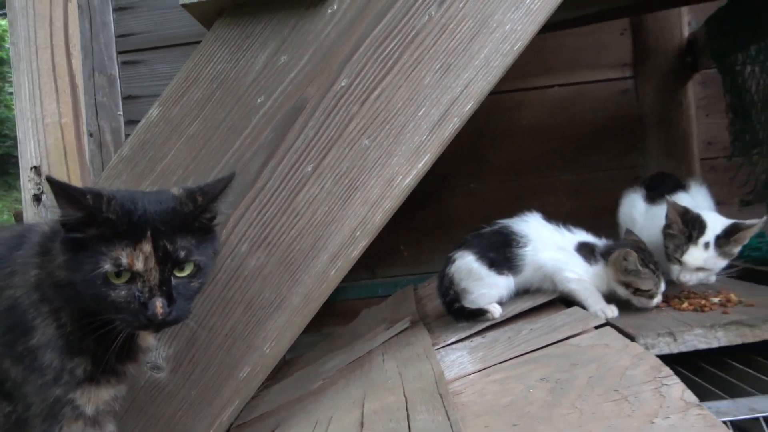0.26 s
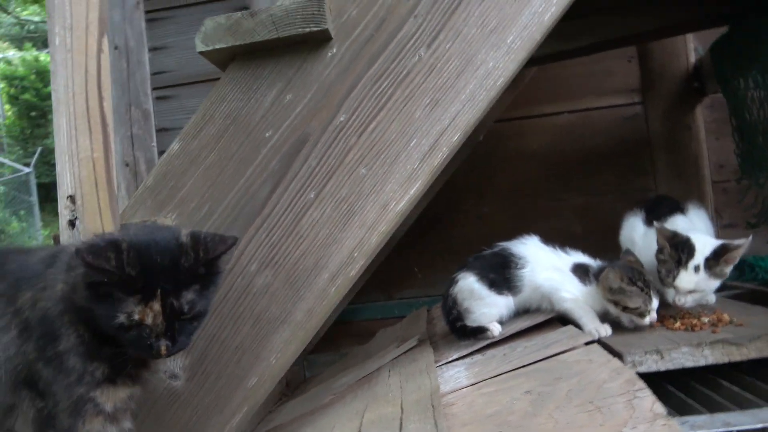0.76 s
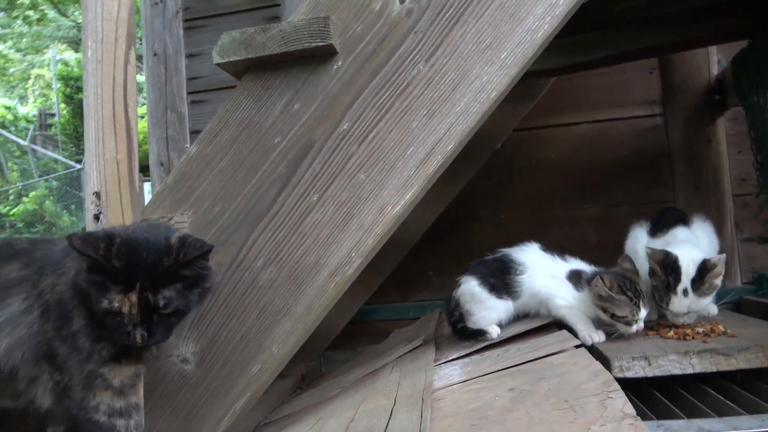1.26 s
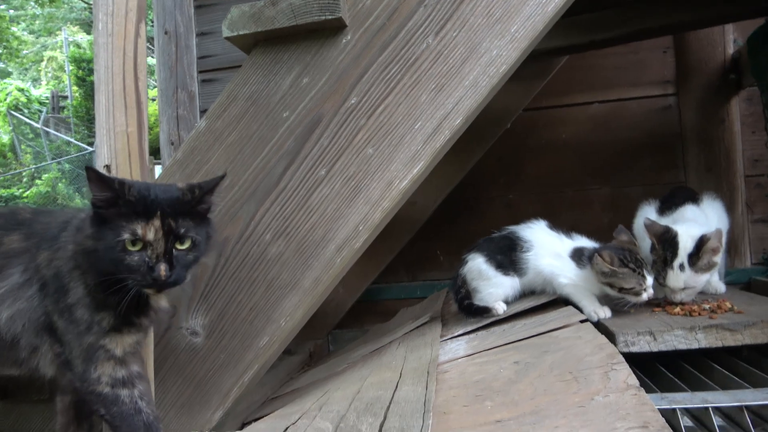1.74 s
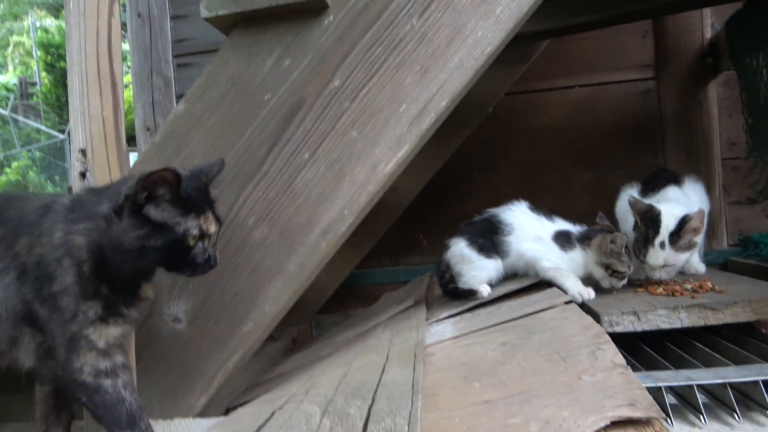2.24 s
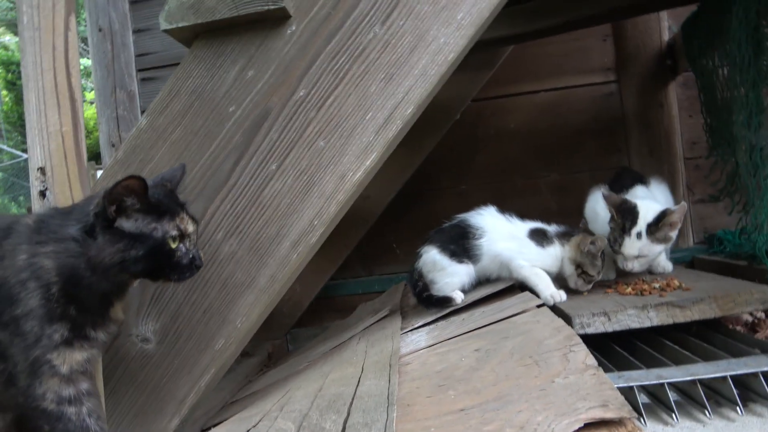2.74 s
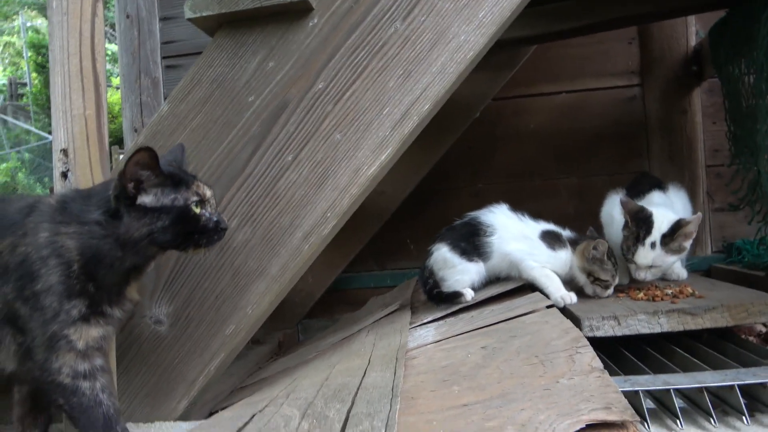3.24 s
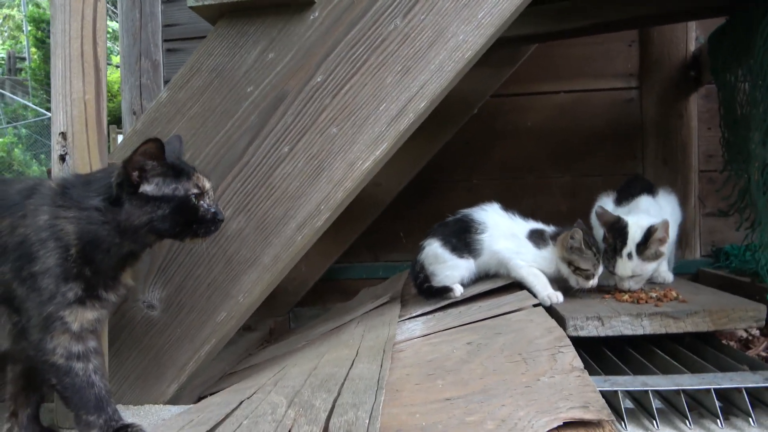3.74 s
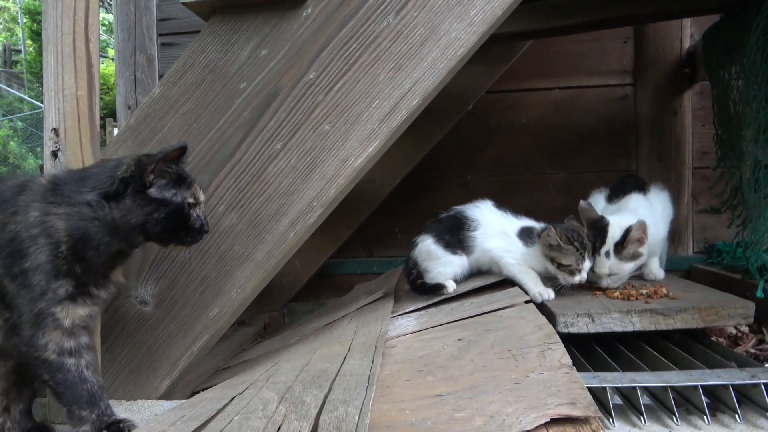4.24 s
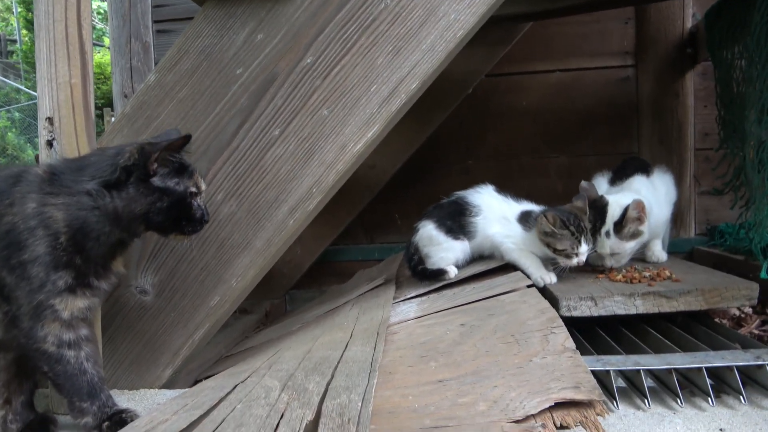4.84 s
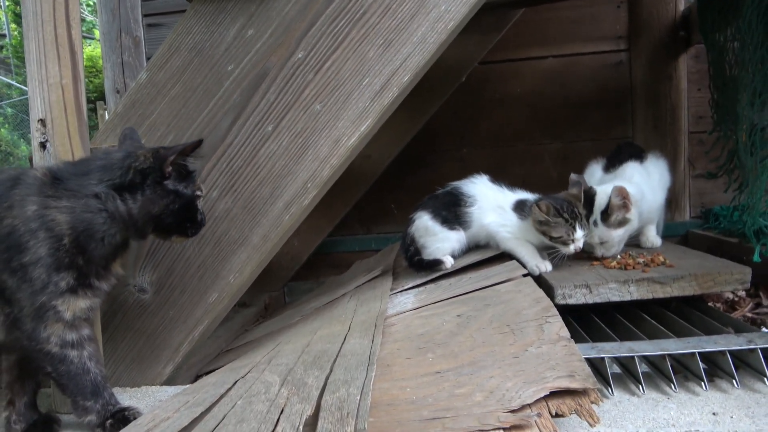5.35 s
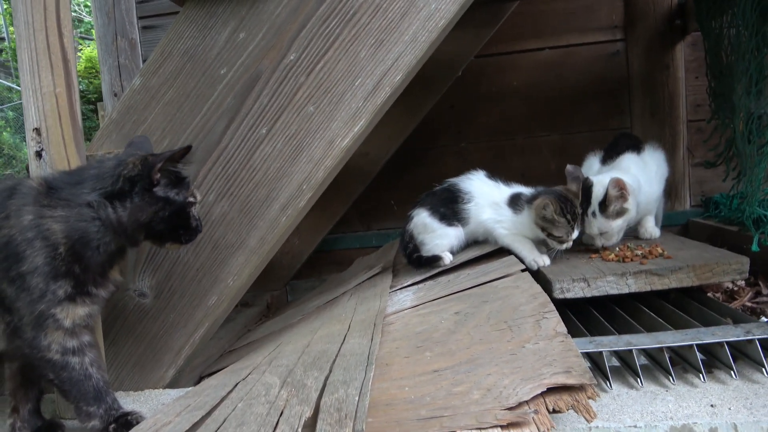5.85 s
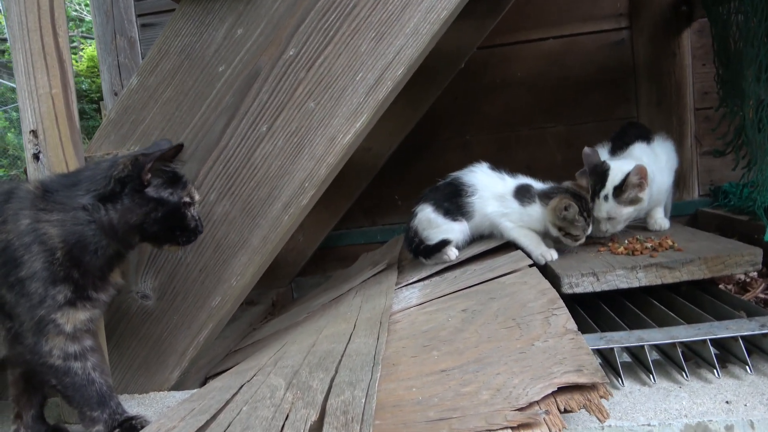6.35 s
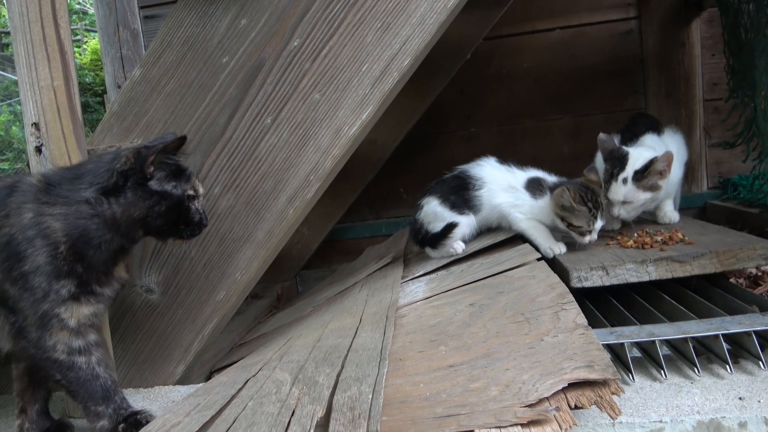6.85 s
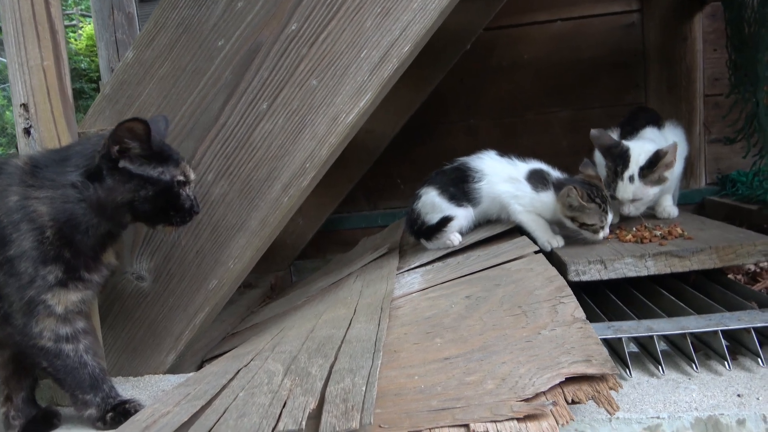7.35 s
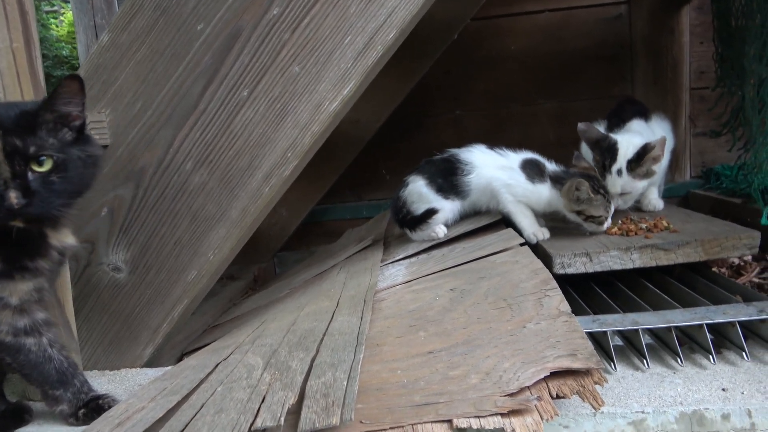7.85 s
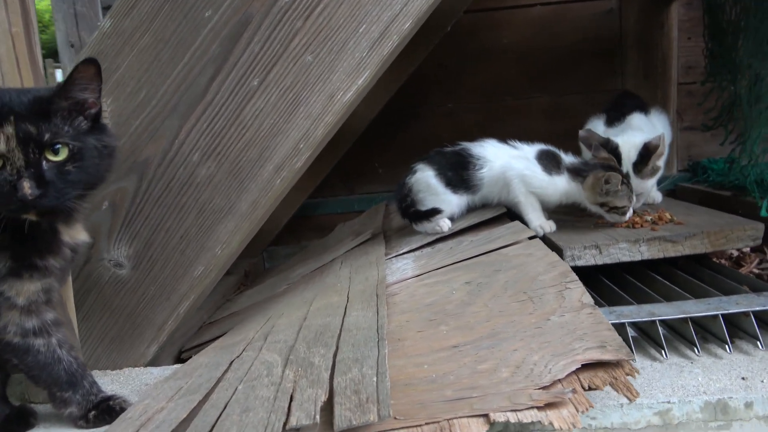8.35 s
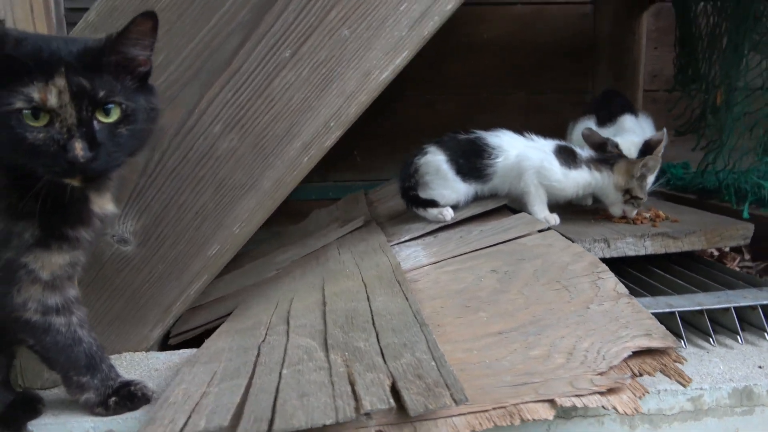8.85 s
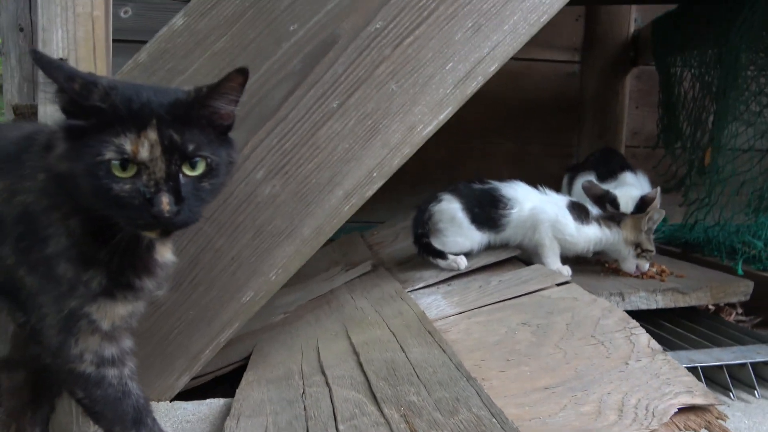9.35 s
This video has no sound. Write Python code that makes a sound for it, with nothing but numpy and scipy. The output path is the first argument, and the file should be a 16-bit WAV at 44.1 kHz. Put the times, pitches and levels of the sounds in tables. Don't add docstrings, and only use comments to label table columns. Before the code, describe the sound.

A nearby summer cicada buzzes in a fast, shrill pulsing rasp over a dense far insect chorus, with faint clicks as kittens eat dry food.

```python
import sys
import numpy as np
from scipy import signal
from scipy.fft import rfft, irfft, next_fast_len
from scipy.io import wavfile
from scipy.ndimage import uniform_filter1d, map_coordinates

SR = 44100
rng = np.random.default_rng(int(sys.argv[2]) if len(sys.argv) > 2 else 0)


def convert_level_to_amplitude(level_db):
    exponent = np.asarray(level_db, float) / 20
    return 10 ** exponent


def dump_mix(stems):
    frames = np.atleast_2d(stems).T
    limited = np.clip(frames, -1, 1)
    pcm = np.round(limited * 32767).astype(np.int16)
    wavfile.write(sys.argv[1], SR, pcm)


N = 423360

# [t/s, pumping lead/cycles, effort level/dB, lower against upper body mode level/dB]
NEAR_SINGER = [(0.0, -0.55, -24.5, -2), (.8, -0.4, -27, 0), (1.3, -0.44, -25.5, -1),
               (1.8, -0.45, -25.5, -5), (2.8, -0.55, -25, -3), (3.2, -0.47, -25, -3),
               (3.8, -.57, -24.5, -3), (4.1, -0.49, -24.5, -2), (4.8, -0.5, -26, -5.5),
               (5.4, -0.56, -27.5, -3.5), (5.7, -0.41, -27, -4), (6.5, -0.34, -27.5, -3.5),
               (6.8, -0.23, -27, -3), (7.1, 0.089, -28.5, -3), (7.3, 0.053, -25.5, 1),
               (8.2, 0.0081, -26.5, 1.5), (9.2, -0.3, -26.5, -1), (9.6, -0.32, -29, -14)]
# [f/Hz, level/dB]
BODY_BAND = [(4000, -16.5), (4500, -10.5), (4900, -7), (5300, 3), (5700, -2), (6200, 3.5), (6600, 1),
             (7500, -3), (8500, -8), (9300, -7), (9800, -24)]
# [f/Hz, level/dB]
OVERTONE_BAND = [(9500, -37), (11000, -1), (12500, 5.5), (13500, 0.5), (15500, 11), (16500, -4)]
# [f/Hz, level/dB]
RASP_BAND = [(13000, -13), (14300, 5), (15600, -2), (16500, 3)]
# [f/Hz, level/dB]
DRONE_BAND = [(1900, -11.5), (2200, -5.5), (2400, 2), (2600, 4.5), (2900, 2.5), (3100, -5), (3400, -8)]
# [t/s, level/dB]
CHORUS_LEVEL = [(0.0, -22), (2.65, -22), (3.7, -23), (4.2, -23.5), (5.1, -22.5), (5.5, -22.5), (7.2, -22.5),
                (7.6, -23), (8.3, -23.5), (8.8, -22.5), (9.1, -23), (9.4, -21.5), (9.6, -22)]
# [f/Hz, level/dB per Hz]
CHORUS_LOW_BAND = [(2000, -97), (3400, -40), (3980, -27.5), (4300, -15.5), (4960, -4.5), (5660, -2.5),
                   (6120, -3), (7460, -6), (8070, -6), (9260, -13.5), (9520, -22.5), (10200, -19.5),
                   (13300, -54), (22000, -120)]
# [f/Hz, level/dB per Hz]
CHORUS_HIGH_BAND = [(9000, -25), (9900, -16), (11000, -8), (12100, -3.5), (13100, -7), (14200, -3),
                    (15100, -2.5), (16000, -12)]
# [f/Hz, level/dB per Hz]
AIR_SPECTRUM = [(12, -45), (20, -0.5), (118, 6.5), (476, 0), (694, -3.5), (759, -1), (1010, -15),
                (1720, -9.5), (2510, -5), (2810, -9.5), (3350, -4.5), (4000, -17), (5200, -39),
                (8800, -120)]
# [f/Hz, level/dB]
RUSTLE_SPECTRUM = [(250, -10), (500, -2.5), (800, -1), (1150, -2), (1700, -10), (3000, -13)]
# [f/Hz, level/dB]
DISTANT_MOTOR = [(107.7, -75)]
# [f/Hz, correlation/1]
MIC_LIKENESS = [(60, 0.5), (130, 0.36), (290, 0.3), (640, 0.61), (1410, 0.59), (3100, 0.97), (6820, 0.85),
                (15000, 0.81)]
# [f/Hz, left minus right level/dB]
MIC_LEAN = [(60, 2), (110, 2), (200, 0.5), (380, 1.5), (700, 3), (1290, -1), (2380, 6), (4400, 4),
            (6000, 0.1), (8120, 0.7), (15000, 0.5)]
# [t/s, peak level/dB, ring f/Hz]
FOOD_NUDGES = [(.13, -34, 915), (.251, -28.5, 900), (.417, -37, 318), (.452, -39, 660), (.489, -33, 816),
               (.724, -27, 1220), (.812, -33, 960), (1.216, -26, 660), (1.281, -25.5, 960),
               (1.411, -37, 759), (2.149, -34, 649), (2.524, -29, 1160), (3.218, -37, 301),
               (6.786, -31, 547), (9.303, -27.5, 660), (9.401, -46, 640), (9.42, -24, 1006)]
# [t/s, peak level/dB, ring f/Hz]
FOOD_CRACKS = [(.023, -39, 530), (.394, -31, 610), (.395, -31, 3200), (.684, -39, 740), (.723, -38, 1800),
               (.794, -45, 673), (.986, -36, 855), (1.323, -42, 1620), (1.62, -43, 1000), (2.188, -42, 579),
               (2.485, -34.5, 1160), (2.61, -36, 620), (2.646, -32.5, 2000), (4.904, -37.5, 1080),
               (5.215, -40, 1330), (6.977, -33, 595), (7.036, -41, 610), (7.093, -38, 650),
               (9.421, -37, 3030)]
# [t/s, peak level/dB, ring f/Hz]
HAND_GRIPS = [
    (1.799, -36, 780),
    (4.129, -37, 428),
    (4.903, -28, 305),
    (6.807, -23.5, 710),
    (7.264, -37, 301),
    (7.491, -32.5, 630),
    (7.671, -35.5, 750),
    (8.882, -36, 665),
]
# [thud level/dB, tick level/dB, left minus right level/dB]
CONTACT_KINDS = [
    (-19, -22, 4),
    (-21, -4.5, 1),
    (-4.5, -21, 2.5),
]

PUMP_HZ = 13.8
SLACK_HZ, TAUT_HZ = 5620, 9200
LIFT_STARTS, LIFT_TAKES, DROP_STARTS, DROP_TAKES, REST = 0.096, 0.37, 0.64, 0.23, 0.14
OVERTONE_DB, OVERTONE_GROWS = -30, 0.95
HIGH_DB = -4
RUSTLE_DB, BUSY_DB, BUSY_S = -63, 2.5, .2


def unit(x):
    return x / np.sqrt(np.mean(x ** 2) + 1e-20)


def along(points, hz):
    f, value = np.transpose(points)
    return np.interp(np.log(hz + 1), np.log(f + 1), value)


def shape(points, hz):
    below = (points[0][0] * .7, -100)
    above = (points[-1][0] * 1.3, -100)
    return convert_level_to_amplitude(along([below] + list(points) + [above], hz))


def curves(rows):
    s, *columns = np.transpose(rows)
    return [np.interp(np.arange(N) / SR, s, column) for column in columns]


def wobble(rate):
    knots = rng.standard_normal(int(N * rate / SR) + 4)
    return map_coordinates(knots, [np.arange(N) * rate / SR])


def filtered(x, response):
    m = next_fast_len(N + 8192)
    return irfft(rfft(x, m) * response(np.fft.rfftfreq(m, 1 / SR)), m)[..., :N]


def spread(pair, spectrum):
    def response(hz):
        turn = np.arccos(np.clip(along(MIC_LIKENESS, hz), -1, 1)) / 2
        return shape(spectrum, hz) * [np.cos(turn), np.sin(turn)]

    mid, side = filtered(pair, response)
    return unit(np.array([mid + side, mid - side]))


def patchy(patch_db):
    z = signal.stft(rng.standard_normal((2, N)), nperseg=512)[2]
    over_pitch = uniform_filter1d(rng.standard_normal(z.shape[1:]), 5, 0)
    field = uniform_filter1d(over_pitch, 8, 1)
    return signal.istft(z * convert_level_to_amplitude(patch_db * unit(field)), nperseg=512)[1][:, :N]


def tymbal(click_hz, drift, weak_db, rough, echo_s):
    cycles = np.cumsum(click_hz * (1 + drift * wobble(6))) / SR
    second = cycles % 1 > .5
    clicks = np.diff(np.floor(2 * cycles), prepend=0)
    clicks = clicks * convert_level_to_amplitude(weak_db * second + 0.5 * rng.standard_normal(N))
    t = np.arange(SR // 25) / SR
    heard = np.zeros((2, N))
    for side in (0, 1, 0, 1):
        scatter = rng.standard_normal((2, len(t))) * convert_level_to_amplitude(-60 * t / echo_s)
        one_tymbal = wobble(5) * (clicks * (second == side))
        heard += signal.oaconvolve(one_tymbal[None], scatter, axes=1)[:, :N]
    heard /= np.sqrt(np.abs(uniform_filter1d(heard ** 2, size=4000)) + 1e-9)
    share = np.clip(rough, 0, 1)
    return np.sqrt(1 - share) * heard + np.sqrt(share) * rng.standard_normal((2, N))


def singer():
    s, lead, _, lower_db = np.transpose(NEAR_SINGER)
    main_db = curves(NEAR_SINGER)[1]
    over_db = OVERTONE_DB + OVERTONE_GROWS * (main_db - main_db.mean())
    clicks = tymbal(click_hz=199.16, drift=.007, weak_db=-1, rough=0.24, echo_s=0.017)
    hz, t, z = signal.stft(clicks, SR, nperseg=256, noverlap=192)
    hz = hz[:, None]

    cycle = (PUMP_HZ * t + np.interp(t, s, lead)) % 1

    def ease(start, takes):
        return np.sin(np.pi / 2 * np.clip((cycle - start) / takes, 0, 1)) ** 2

    lift = REST + (1 - REST) * (ease(LIFT_STARTS, LIFT_TAKES) - ease(DROP_STARTS, DROP_TAKES))
    centre = SLACK_HZ + (TAUT_HZ - SLACK_HZ) * lift
    narrowing = 1 - 0.65 * lift

    lower = np.clip((5800 - hz) / 300, 0, 1) * (hz > 3500)
    effort_db = 0.89 * np.interp(t, np.arange(N) / SR, wobble(14))
    z = z * convert_level_to_amplitude(effort_db + lower * (np.interp(t, s, lower_db) + 3.0))

    def band(ratio, width_hz):
        resonance = np.exp(-.5 * ((hz - ratio * centre) / (width_hz * narrowing)) ** 2)
        return signal.istft(z * resonance, SR, nperseg=256, noverlap=192)[1][:, :N]

    main = convert_level_to_amplitude(main_db + 2.0) * spread(band(0.91, width_hz=1190), BODY_BAND)
    under = convert_level_to_amplitude(main_db - 32.0) * spread(band(0.55, width_hz=1700), DRONE_BAND)
    overtone = convert_level_to_amplitude(over_db + 2.0) * spread(band(1.752, width_hz=2070), OVERTONE_BAND)
    rasp = tymbal(click_hz=168, drift=0.0056, weak_db=-15, rough=.1, echo_s=0.004)
    raised = np.interp(np.arange(N) / SR, t, lift) ** 1.2
    shrill = convert_level_to_amplitude(over_db - 7.5) * unit(raised * spread(rasp, RASP_BAND))
    return main + under + shrill + overtone


def chorus():
    [low_db] = curves(CHORUS_LEVEL)
    high_db = low_db + HIGH_DB
    swell_db = 0.077 * wobble(7.4)
    crowd = convert_level_to_amplitude(low_db - 1.0 + swell_db) * spread(patchy(patch_db=1.5), CHORUS_LOW_BAND)
    crowd += convert_level_to_amplitude(high_db - 1.0 + swell_db) * spread(patchy(patch_db=1.0), CHORUS_HIGH_BAND)
    hum = tymbal(click_hz=193.4, drift=.004, weak_db=0, rough=0.74, echo_s=0.03)
    return crowd + convert_level_to_amplitude(-53 + 0.34 * wobble(12.0)) * spread(hum, DRONE_BAND)


def rustle():
    contacts = np.bincount([round(row[0] * SR) for row in FOOD_NUDGES + FOOD_CRACKS], minlength=N)
    busy = filtered(contacts, lambda hz: SR * BUSY_S * np.exp(-(np.pi * hz * BUSY_S) ** 2))
    level_db = RUSTLE_DB + BUSY_DB * np.sqrt(np.abs(busy)) * 2
    grains = convert_level_to_amplitude(4.4 * wobble(60)) * rng.standard_normal((2, N))
    return convert_level_to_amplitude(level_db) * spread(grains, RUSTLE_SPECTRUM)


def motor():
    t = np.arange(N) / SR
    return sum(convert_level_to_amplitude(db + wobble(2.95)) * np.sin(2 * np.pi * hz * t + 1.2 * wobble(3.3))
               for hz, db in DISTANT_MOTOR)


def air():
    level_db = -52.0 + 0.42 * wobble(2.14) + 0.76 * wobble(7.2)
    return convert_level_to_amplitude(level_db) * spread(patchy(patch_db=1.94), AIR_SPECTRUM)


def knocks():
    out = np.zeros((2, N + SR))
    t = np.arange(SR // 8) / SR

    def ring(hz, t60, rise):
        return np.sin(2 * np.pi * hz * t) * convert_level_to_amplitude(-60 * t / t60) * (1 - np.exp(-t / rise))

    groups = zip((FOOD_NUDGES, FOOD_CRACKS, HAND_GRIPS), CONTACT_KINDS)
    contacts = [(*row, *kind) for rows, kind in groups for row in rows]
    for s, db, hz, thud_db, tick_db, pan_db in contacts:
        low, high, top = rng.uniform([.4, 1.3, 1.9], [.7, 1.7, 2.5])
        hit = ring(hz, 0.012, 0.00095)
        hit += convert_level_to_amplitude(-11) * ring(high * hz, 0.016, 0.0019)
        hit += convert_level_to_amplitude(-10.5) * ring(low * hz, 0.019, 0.0014)
        hit += convert_level_to_amplitude(-9.5) * ring(top * hz, 0.0083, 0.00086)
        hit += convert_level_to_amplitude(thud_db + 5) * ring(137, 0.032, 0.01)
        tick_hz = rng.uniform([1390, 2100, 2770, 3480], [2130, 2800, 3380, 4350])
        hit += convert_level_to_amplitude(tick_db + 4) * sum(ring(f, 0.0066, 0.00029) for f in tick_hz)
        reflections = rng.standard_normal(2500) * convert_level_to_amplitude(-60 * t[:2500] / 0.043)
        echo = signal.fftconvolve(hit[:1500], reflections)
        hit[150:150 + len(echo)] += convert_level_to_amplitude(-34) * echo
        start = round((s + .0015) * SR)
        sides_db = np.array([[pan_db / 2], [-pan_db / 2]])
        out[:, start:start + len(t)] += convert_level_to_amplitude(db + 5.0 + sides_db) * hit
    return out[:, :N]


def scene():
    return singer() + chorus() + rustle() + motor() + air() + knocks()


def top_cut(x):
    return signal.sosfilt(signal.butter(12, 15800, fs=SR, output="sos"), x)


def record(dry):
    heard = dry / (1 + np.abs(dry / .55) ** 6) ** (1 / 6)
    heard = filtered(heard, lambda hz: convert_level_to_amplitude(along(MIC_LEAN, hz) * [[.5], [-.5]]) * (hz < 15750))
    return top_cut(heard)


dry = scene()
out = record(dry)
dump_mix(out)
```